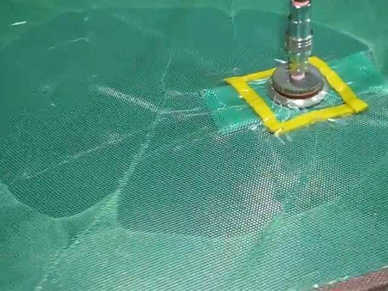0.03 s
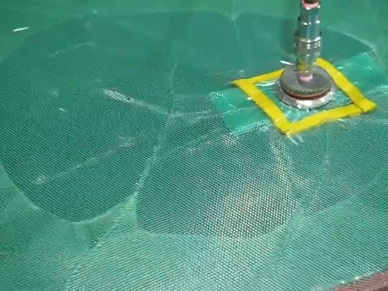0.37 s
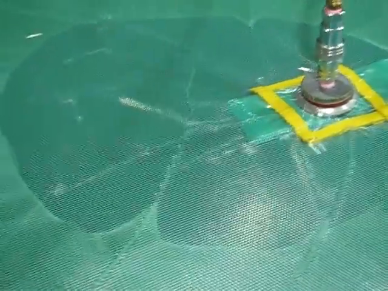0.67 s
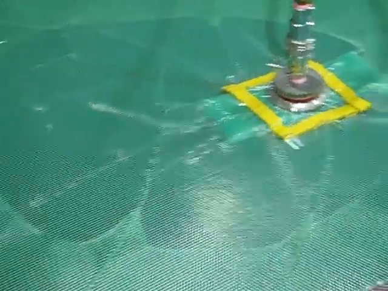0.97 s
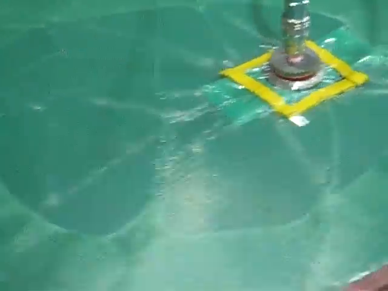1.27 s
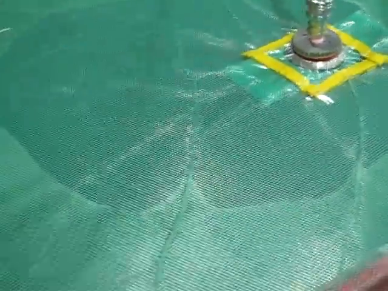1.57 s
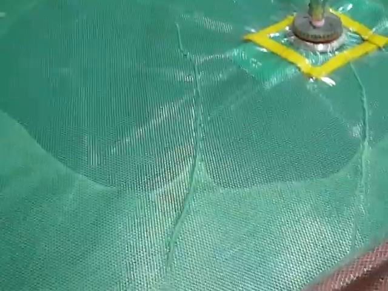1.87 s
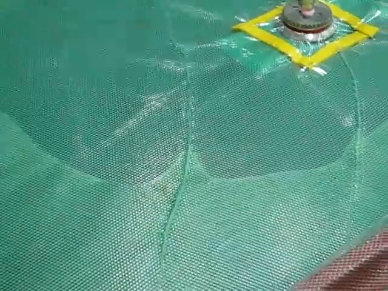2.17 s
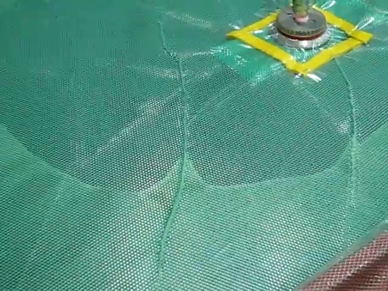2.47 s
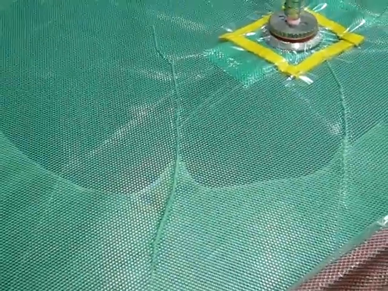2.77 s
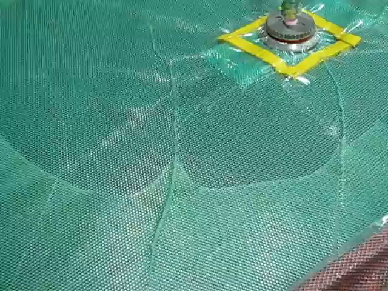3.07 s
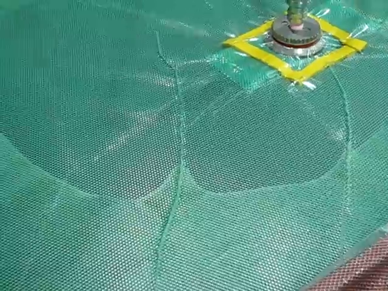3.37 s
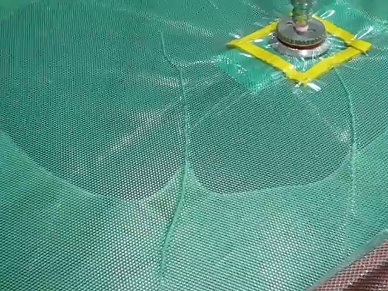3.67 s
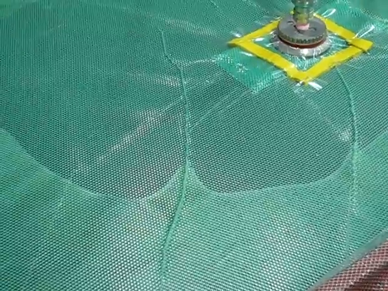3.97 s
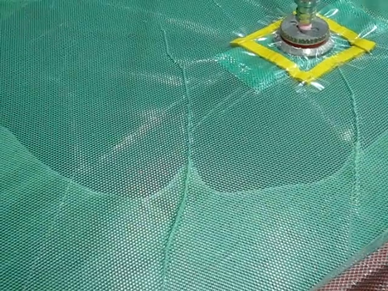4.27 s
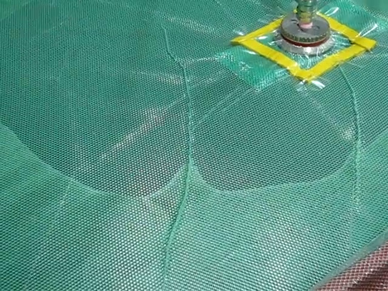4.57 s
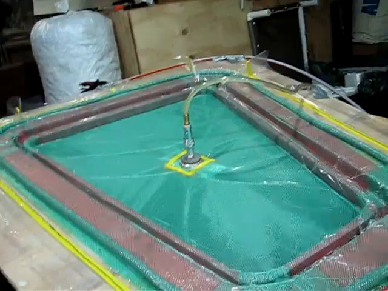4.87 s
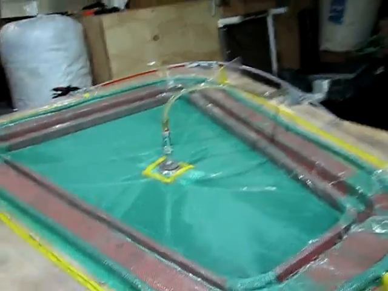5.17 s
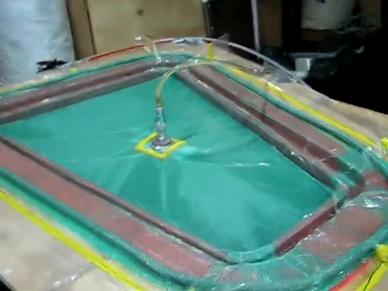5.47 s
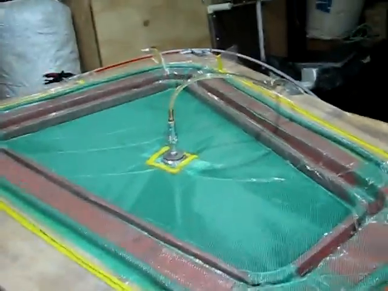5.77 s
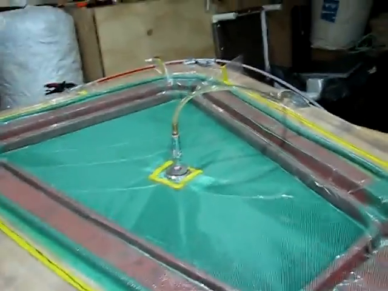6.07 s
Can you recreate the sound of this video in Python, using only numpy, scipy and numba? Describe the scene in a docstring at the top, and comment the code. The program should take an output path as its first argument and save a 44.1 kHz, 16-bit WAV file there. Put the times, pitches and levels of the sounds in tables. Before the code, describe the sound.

A vacuum pump runs steadily in a workshop, giving a bright buzzing hiss over a mechanical hum and rushing air. Thin whistles and a wavering squeal sit on top, swelling and fading as the microphone shifts. Late on, the sound drops out twice in quick succession, then returns from a little further back with a rattling ring added.

```python
"""A workshop, where a rotary-vane vacuum pump runs steadily, holding a plastic bag tight on a mould.
Over a bed of rushing air, the shaft drives a hum and the vanes' buzzing hiss; motor and bearings whine,
two thin whistles sit on top, and the casing squeals in a cluster of beating tones.
The tones swell and fade as the listener shifts place. Twice the sound drops out for an instant
and swells back from somewhere else, ending further back, where a rattling ring comes forward."""
import sys
import numpy as np
from scipy import signal
from scipy.fft import rfft, irfft
from scipy.io import wavfile
from scipy.ndimage import uniform_filter1d, map_coordinates
from numba import njit

SR = 44100
rng = np.random.default_rng(int(sys.argv[2]) if len(sys.argv) > 2 else 0)


def to_wav(sig):
    """Store sig (one row per channel, or 1-D mono) as 16-bit WAV at the path in sys.argv[1].

    Samples outside -1..1 are clipped; the rate is SR.
    """
    pcm = np.clip(np.atleast_2d(sig), -1, 1) * 32767
    pcm = np.round(pcm).astype(np.int16)
    wavfile.write(sys.argv[1], SR, pcm.T)  # frames by channels


N = 270333
SHAFT_HZ, VANES, TOP_HZ = 48.31, 3, 15750
DROPOUT_FADE_S = 0.023
TIME = np.arange(N) / SR
FREQ = np.maximum(np.arange(N // 2 + 1) * SR / N, 1)
ORDERS = np.arange(1, int(TOP_HZ / SHAFT_HZ))  # multiples of the shaft rate
SIDES = np.array([[1], [-1]])  # left, right

# Levels are relative, ahead of the mix faders; pan is left minus right.
# listener's path: (time [s], place [0-2 beside the mould, 3 further back])
LISTENER_PATH = [(0, 0), (.5, .05), (1.15, .35), (1.65, 1), (4.5, 1), (4.52, 2), (4.84, 2), (4.86, 2.8),
                 (5.1, 3), (6.13, 3)]
# mix at each place, 0 to 3: (overall level [dB], hiss lift [dB])
PLACE_MIX = [(-34, 14), (-34.5, 14), (-32.5, 12), (-31.5, 11.5)]
# gaps in the sound: (fade start [s], return [s], depth [dB])
GAPS = [(4.482, 4.525, -39), (4.820, 4.865, -46)]
# passing one tone's crest or node: (time [s], half length [s], tone [Hz], swell [dB])
CRESTS_AND_NODES = [(.03, .09, 5323.7, 13.5), (.92, .12, 5323.7, 4), (1.21, .17, 5323.7, 7.5),
                    (1.47, .13, 5323.7, -10), (2.0, .22, 5323.7, 2), (5.25, .2, 5323.7, 7),
                    (1.05, .15, 6112.5, 7.5), (1.4, .5, 3745.8, 4), (.92, .17, 2425.3, 9),
                    (1.37, .15, 2398.6, -14), (1.37, .15, 2406.8, -14), (1.4, .15, 2436.2, 5),
                    (1.1, .35, 2510.0, 7), (1.35, .2, 2526.1, 7), (1.45, .2, 2549.0, 6),
                    (1.1, .25, 289.9, 3), (5.57, .05, 869.6, -3)]
# stereo tilt of air, ring and hiss: (frequency [Hz], pan [dB])
STEREO_TILT = [(100, 0), (1500, 0.1), (2400, -1.3), (4000, 0.6), (5900, 3.7), (7000, -1.5), (8000, -2.7),
               (9000, -8), (10400, -7.5), (11500, 2), (12550, 11), (13700, 2), (15000, 1.5)]
# how alike the ears hear the room: (frequency [Hz], likeness [0-1])
EAR_LIKENESS = [(60, 0.5), (135, 0.91), (600, .88), (1400, 0.68), (2500, 0.52), (5000, 0.2), (9000, 0.13)]
# colour of the air bed: (frequency [Hz], level close [dB], level further back [dB])
AIR_COLOUR = [(25, -46, -61), (70, -42, -36), (110, -34, -30), (193, -30.5, -27), (296, -28, -27),
              (603, -26.5, -23.5), (1060, -25, -24), (1180, -28.5, -25), (2010, -29.5, -28.5),
              (2110, -38, -32), (2860, -31, -27.5), (3400, -31.5, -26), (5700, -29.5, -26),
              (9000, -36.5, -33.5), (15000, -47.5, -43)]
# resonances the air excites: (centre [Hz], width [Hz], level close [dB], level further back [dB])
AIR_RESONANCES = [(136, 11.2, -20.5, -24), (146.6, 17, -25, -16.5), (332, 39, -26.5, -18.5),
                  (671, 18, -22.5, -23), (767, 41, -28.5, -20.5), (1166, 38, -36, -21.5),
                  (1472, 27, -26.5, -45), (1810, 260, -29, -25), (2425, 260, -21.5, -19.5),
                  (2570, 53, -35, -18)]
# fader ride of the air bed: (time [s], level [dB])
AIR_RIDE = [(0, 1), (1.0, 0.2), (2.5, -0.65), (4.0, 0.5), (4.45, 0.4), (4.8, 1), (5.05, -4.5), (5.4, -2),
            (5.8, -2.5), (6.13, -4)]
# fader ride of the rattling ring: (time [s], level [dB])
RING_RIDE = [(4.8, -28), (4.95, 3), (5.15, 2.5), (5.4, 4.3), (5.6, 3), (5.9, 2), (6.13, 0.5)]
# soft bumps either side of the second gap: (time [s], pitch [Hz], level [dB])
LOW_BUMPS = [(4.818, 115, -30), (4.876, 78.5, -36)]
# partials of the hum: (order [x shaft rate], level at each of places 0-3 [dB])
HUM_PARTIALS = [(3, -12, -10.5, -2, -2.5), (6, -.5, -11.5, -8, -4.5), (7, -20, -16, -11, -9),
                (9, 1, -4.3, -6, -4.5), (10, -16, -15, -20, -15), (12, -2, -.3, -23, -2),
                (13, -14, -9, -2, -10), (15, -8, -11, 0, -5), (18, -11, -12, -12, 3.2),
                (22, -12, -9.5, -11, -20), (36, -27, -27, -18, -13)]
# motor and bearing tones, with a few lone shaft orders high in the hiss (5507, 5652, 5792, 6584 Hz): (pitch
# [Hz], level at each of places 0-3 [dB], pan [dB])
WHINE_TONES = [(100.0, -24, -25, -27, -32, 0), (223.5, -16, -18, -20, -20, 0),
               (233.5, -9.5, -17, -8, -11, -2), (281.0, -13, -19, -20, -18, 0),
               (969.5, -8.5, -2.7, -4, -14, 1), (3745.8, -16, -10, -28, -19, -6),
               (5507.0, -14, -11, -18, -18, 4), (5555.1, -11, -9, -15, -15, 10),
               (5652.3, -15, -6.5, -21, -18, 4), (5792.0, -14, -9, -20, -20, 3),
               (6584.0, -14, -10, -18, -18, -2), (10647.8, -21, -19, -37, -33, -8),
               (11014.0, -24, -34, -40, -34, -2)]
# thin whistles: (pitch [Hz], pan [dB], level at each of places 0-3 [dB])
WHISTLE_TONES = [(5323.7, 2, -3.5, 2.6, -9, -12), (6112.5, 8, -4.5, -5, -10, -18)]
# the casing's tone cluster: (pitch [Hz], weight at each of places 0-3 [dB])
CASING_TONES = [(2321.9, -13, -15, -22, -14), (2377.1, 5.5, 2, 1, -3), (2398.6, 2, 0, -3, -9),
                (2406.8, -4, -4.5, 2, -10), (2425.3, -3.5, -7, -17, -13), (2436.2, -3, -3, -17, -7),
                (2467.5, -12, -15, -7, -13), (2496.0, -14, -13, -18, -8), (2510.0, -10, -17, -18, -9),
                (2526.1, -12, -11, -1, -13), (2549.0, -19, -11, -5, -23), (2614.8, -13, -7, -12, -10)]
# fader ride of the squeal: (time [s], level [dB])
SQUEAL_RIDE = [(0, 6), (.25, 12.5), (.75, 10), (.95, 11), (1.4, 5.5), (1.8, 9.5), (2.3, 8), (2.9, 9),
               (3.4, 7.5), (4.35, 10), (4.6, 8), (5.0, 9.5), (5.25, 10), (5.65, 1), (5.95, 6.5), (6.13, 3)]
# colour of the vane hiss: (frequency [Hz], level [dB])
HISS_COLOUR = [(2800, -32), (4500, -24.5), (5500, -5.5), (6250, -11), (6700, -1), (7000, 2), (8150, 1),
               (8500, -1), (8750, -11.5), (9100, -1), (9650, -24), (12000, -32), (15500, -26)]
# orders that poke out of the hiss: (order [x shaft rate], pan [dB], lift at each of places 0-3 [dB])
BUZZ_ACCENTS = [(144, 5, 4, 5, 0, 2), (147, -6, 3, -2, 0, 3), (150, 2, 0, 3, 3, 5), (151, 0, 6, 7, 3, 3),
                (154, -4, 6, 9.5, 0, 0), (156, 2, 2, 2, 0, 0), (159, 0, -2, 2, 0, -2), (160, 0, 7, 0, 0, 0),
                (162, -1, -1, 4, -2, -3), (163, 0, 4, 0, 9, 0), (165, -2, 5, 5.5, -2, 5),
                (170, -5, 8, 0, 0, 0), (171, -1, 3, 2, 4, 3), (173, -4, 0, 0, 8, 2)]
# two hiss resonances that shift as the listener moves: (time [s], lower centre [Hz], left lift [dB],
# right lift [dB], upper centre [Hz], left lift [dB], right lift [dB])
PEAK_SWEEPS = [(0, 7300, 1, 3, 7950, 1, 2), (.5, 7220, 5, 3, 7950, 6, 0), (.8, 7300, 5, 4, 8200, 5, 5),
               (1.1, 7300, -1, 0, 8170, 0, 5), (1.35, 7100, 0, 7, 8270, 5, 4),
               (1.65, 7350, -1, 0, 8000, -1, 4), (2.05, 7320, 3, 3, 7950, 1, 5),
               (4.5, 7320, 3, 3, 7950, 2, 4.5), (4.55, 7300, 5, 2, 8300, 0, 4),
               (4.78, 7300, 8, 6, 8330, 1, 8), (4.9, 7250, 5, 2, 8330, -1, 2),
               (5.15, 7220, 6, 4, 8350, -1, 1), (5.5, 7350, -2, -1, 8100, -1, 0),
               (5.8, 7400, 4, 1, 7950, 2, 1), (6.13, 7350, 0, 1, 7950, 0, 4)]
# broad resonance low in the hiss: (time [s], lift [dB])
HISS_BODY_RIDE = [(0, 1), (.3, 3), (.7, -9), (1.05, 0), (1.45, -9), (1.8, -2), (2.08, 3), (2.35, -1),
                  (3.8, -0.5), (4.4, -0.5), (4.7, 1), (5.3, 4.5), (5.6, -1), (5.85, 1), (6.13, -6)]


def undb(db):
    """Decibels to gain."""
    return np.exp(np.asarray(db) * np.log(10) / 20)


def curve(rows, column=1):
    """One column of a table of times, for every sample."""
    rows = np.array(rows)
    return np.interp(TIME, rows[:, 0], rows[:, column])


def spectrum(rows, hz, column=1):
    """One column of a table of frequencies, joined on a log axis."""
    rows = np.array(rows)
    return np.interp(np.log(hz), np.log(rows[:, 0]), rows[:, column])


def along_path(place_db):
    """Crossfade one level per place along the listener's path."""
    return np.interp(curve(LISTENER_PATH), np.arange(len(place_db)), place_db)


def drift(per_s):
    """Smooth random modulation, per_s new values a second; spread near 1."""
    knots = rng.standard_normal(int(TIME[-1] * per_s) + 3)
    slopes = signal.resample_poly(knots, up=10, down=1)
    return np.interp(TIME * per_s + rng.random(), np.arange(len(slopes)) / 10, slopes)


def panned(db):
    """Left and right gains of constant power."""
    gains = undb(np.array([db, -db]) / 2)
    return gains / np.sqrt(np.mean(gains ** 2, axis=0))


def ear_angle(hz):
    """Stereo width: half the phase gap between the ears that gives the room's likeness."""
    return np.arccos(np.clip(spectrum(EAR_LIKENESS, hz), 0, 1)) / 2


@njit
def bandpass(x, hz, width_hz):
    """State-variable band-pass whose centre can sweep, gain 1 at the centre."""
    out, band_state, low_state = np.empty(len(x)), 0., 0.
    for i in range(len(x)):
        tuning, damping = np.tan(np.pi * hz[i] / SR), width_hz / hz[i]
        band = (band_state + tuning * (x[i] - low_state)) / (1 + tuning * (tuning + damping))
        band_state = 2 * band - band_state
        low_state += 2 * tuning * band
        out[i] = damping * band
    return out


def room_noise(gain):
    """Stereo room noise, coloured by a gain for each frequency."""
    mid, side = rfft(rng.standard_normal((2, N)))
    angle = ear_angle(FREQ)
    ears = mid * np.cos(angle) + SIDES * side * np.sin(angle)
    return irfft(ears * gain * panned(spectrum(STEREO_TILT, FREQ)), N) * np.sqrt(SR / 2)


def room_tone(hz, cycles, place_db, pan_db, waver_db):
    """A partial whose strength depends on where the listener stands in the room's standing waves."""
    db = along_path(place_db) + waver_db * drift(7.8)
    for at, half_s, tone_hz, swell_db in CRESTS_AND_NODES:
        if abs(tone_hz - hz) < 1:
            db += swell_db * np.exp(-((TIME - at) / half_s) ** 2)
    phase = 2 * np.pi * (cycles + rng.random()) + ear_angle(hz) * SIDES
    return np.sqrt(2) * undb(db) * panned(pan_db)[:, None] * np.sin(phase)


def slipping(hz, slip_cycles):
    """Running cycle count of a steady pitch that slips a little in phase."""
    return hz * TIME + slip_cycles * drift(14)


def dropouts(creep=.3, snap_db=.5, stutter_db=-10, lag_s=.011, stutter_half_s=.0051):
    """Gain that ducks away, creeps up to a share of the depth, then snaps back and stutters once."""
    db = np.zeros(N)
    for start, back, depth_db in GAPS:
        times = [start, start + DROPOUT_FADE_S, back - .001, back, back + lag_s]
        db += np.interp(TIME, times, [0, depth_db, creep * depth_db, snap_db, 0])
        db += stutter_db * np.exp(-((TIME - back - lag_s) / stutter_half_s) ** 2)
    return undb(db)


def sag(recovery_s=.45):
    """How weak the sound still is: 1 as it returns from a dropout, easing back to 0."""
    share = np.zeros(N)
    for start, back, _ in GAPS:
        release = np.exp(-np.maximum(TIME - back, 0) / recovery_s)
        share = np.where(TIME > start + DROPOUT_FADE_S, release, share)
    return share


def air_rush(turns, pulsing=.016, flutter_db=.6):
    """The bed: cooling air and its room echo, crossfading from a close colour to a distant one."""
    far = np.clip(curve(LISTENER_PATH) - 2, 0, 1)
    air = 0
    for k, share in enumerate((1 - far, far)):
        power = undb(spectrum(AIR_COLOUR, FREQ, column=k + 1)) ** 2
        for hz, width_hz, *db in AIR_RESONANCES:
            power += undb(db[k]) ** 2 / (1 + 2 * ((FREQ - hz) / width_hz) ** 2) ** 2
        air = air + np.sqrt(share) * room_noise(np.sqrt(power))
    vane_pulse = 1 + pulsing * np.cos(2 * np.pi * VANES * turns)
    return air * vane_pulse * undb(curve(AIR_RIDE) + flutter_db * drift(18))


def rattling_ring(hz=3840, width_hz=130):
    """A narrow resonance, shaken at random so that it rattles; it comes up further back."""
    band = room_noise(1 / (1 + 2 * ((FREQ - hz) / width_hz) ** 2))
    return band / band.std() * undb(curve(RING_RIDE))


def bumps(half_s=.011):
    """A few cycles of a low tone that swell and die at once, dead centre."""
    return sum(undb(db) * np.exp(-((TIME - at) / half_s) ** 2)
               * np.sin(2 * np.pi * (hz * TIME + rng.random())) for at, hz, db in LOW_BUMPS)


def shaft_hum(turns):
    """The low end: orders of the shaft, strongest at multiples of the vane rate."""
    return sum(room_tone(order * SHAFT_HZ, order * turns, place_db, pan_db=0., waver_db=1.1)
               for order, *place_db in HUM_PARTIALS)


def motor_whine():
    """Lone, gently wavering tones of motor and bearings, and a few lone shaft orders high in the hiss."""
    return sum(room_tone(hz, slipping(hz, slip_cycles=.063), place_db, pan_db, waver_db=.9)
               for hz, *place_db, pan_db in WHINE_TONES)


def whistles(flutter_db=1.1):
    """Two thin, steady tones with a slight quick flutter."""
    return sum(undb(flutter_db * drift(60))
               * room_tone(hz, slipping(hz, slip_cycles=.02), place_db, pan_db, waver_db=.5)
               for hz, pan_db, *place_db in WHISTLE_TONES)


def casing_squeal():
    """The casing sings close, clean tones that beat; their slow level is evened out for the fader."""
    cluster = sum(room_tone(hz, slipping(hz, slip_cycles=.03), place_db, pan_db=-1.5, waver_db=1.4)
                  for hz, *place_db in CASING_TONES)
    slow_power = uniform_filter1d(np.mean(cluster ** 2, axis=0), size=SR // 4)
    return cluster / np.sqrt(slow_power)


def scrape_loop(lift_db, samples=8192):
    """One shaft turn of vane scrape in stereo, each order lifted over the hiss colour."""
    hz = ORDERS * SHAFT_HZ
    phase = 2 * np.pi * rng.random(len(hz)) + ear_angle(hz) * rng.choice([-1, 1], len(hz)) * SIDES
    gains = undb(spectrum(HISS_COLOUR, hz) + lift_db) * panned(spectrum(STEREO_TILT, hz))
    partials = np.pad(gains * np.exp(1j * phase), ((0, 0), (1, 0)))  # nothing at 0 Hz
    return irfft(partials, samples)


def steady_buzz(turns, place, vane_lift_db=6.5, scatter_db=1.5):
    """The vanes scrape the same wall on every turn, so part of their hiss repeats as a comb of orders."""
    lift_db = vane_lift_db * (ORDERS % VANES == 0) + scatter_db * rng.standard_normal((2, len(ORDERS)))
    for order, pan_db, *accent_db in BUZZ_ACCENTS:
        lift_db[:, order - 1] += accent_db[place] + np.array([pan_db, -pan_db]) / 2
    loop = scrape_loop(lift_db)
    loop /= loop.std()
    return np.array([np.interp(turns % 1 * len(ear), np.arange(len(ear)), ear) for ear in loop])


def drifting_buzz(turns, loops_per_s=9, scatter_db=2.5):
    """The rest of the scrape changes within a few turns, so its orders keep fading in and out."""
    morph = TIME * loops_per_s + rng.random()
    loops = np.array([scrape_loop(scatter_db * rng.standard_normal((2, len(ORDERS))))
                      for _ in range(int(morph[-1]) + 2)])
    playhead = turns % 1 * loops.shape[2]
    ears = np.array([map_coordinates(ear, [morph, playhead], order=1, mode="grid-wrap")
                     for ear in loops.swapaxes(0, 1)])
    ears /= np.hypot(morph % 1, 1 - morph % 1)  # equal-power crossfades
    return ears / ears.std()


def hiss_resonances(ears, peak_width_hz=240., body_hz=5600., body_width_hz=1400.):
    """Two narrow, sweeping peaks make the hiss whistly; a broad one below swells and fades."""
    sweeps = np.array([curve(PEAK_SWEEPS, column=k) for k in range(1, 7)])
    for hz, *lift_db in np.split(sweeps, 2):
        peak = np.array([bandpass(ear, hz, peak_width_hz) for ear in ears])
        ears = ears + (undb(lift_db) - 1) * peak
    body = np.array([bandpass(ear, np.full(N, body_hz), body_width_hz) for ear in ears])
    return ears + (undb(curve(HISS_BODY_RIDE)) - 1) * body


def vane_hiss(turns, steady_share=.6, spray_db=-6, pulsing=.16, pulse_edge=.067, flutter_db=.45):
    """Repeating scrape plus fresh spray, both swelling as each vane passes the outlet."""
    place = curve(LISTENER_PATH)
    # each place hears its own mix of reflections
    steady = sum(np.sqrt(np.clip(1 - abs(place - k), 0, 1)) * steady_buzz(turns, place=k)
                 for k in range(len(PLACE_MIX)))
    buzz = np.sqrt(steady_share) * steady + np.sqrt(1 - steady_share) * drifting_buzz(turns)
    spray = room_noise(undb(spectrum(HISS_COLOUR, FREQ)))
    hiss = buzz + undb(spray_db) * spray / spray.std()
    vane_phase = 2 * np.pi * VANES * turns
    stroke = 1 + pulsing * np.cos(vane_phase) + pulse_edge * np.cos(2 * vane_phase)
    throb_db = .55 * np.cos(2 * np.pi * 4.0 * (TIME - 3.83))  # 4 Hz, with a crest at 3.83 s
    return hiss_resonances(hiss * stroke * undb(throb_db + flutter_db * drift(24.85)))


def scene(air_db=-2.0, hiss_db=-1.65, squeal_db=-2.4, sag_db=-7, hiss_sag_db=-1, wander_db=.25):
    """The mix: one near-steady shaft times hum, air and hiss; levels follow the listener's place."""
    turns = np.cumsum(SHAFT_HZ * (1 + .0002 * drift(12))) / SR
    level_db, hiss_lift_db = (along_path(db) for db in np.transpose(PLACE_MIX))
    weakness = sag()
    pump = shaft_hum(turns) + motor_whine() + undb(air_db) * air_rush(turns) + rattling_ring()
    pump += undb(hiss_db + hiss_lift_db + hiss_sag_db * weakness) * vane_hiss(turns)
    pump += undb(squeal_db + curve(SQUEAL_RIDE)) * casing_squeal()
    pump += whistles()
    pump *= undb(level_db + sag_db * weakness + wander_db * drift(6))
    return (pump + bumps()) * dropouts()


def record(dry):
    """A steep low-pass trims the very top."""
    return signal.sosfilt(signal.ellip(10, .2, 80, TOP_HZ, fs=SR, output="sos"), dry)


dry = scene()
out = record(dry)
to_wav(out)
```